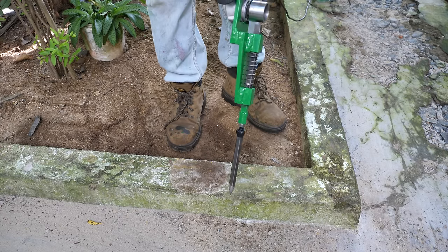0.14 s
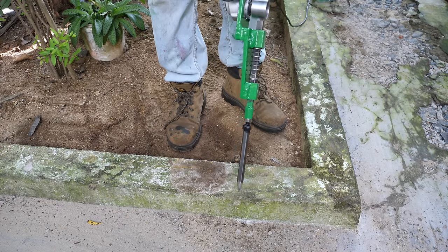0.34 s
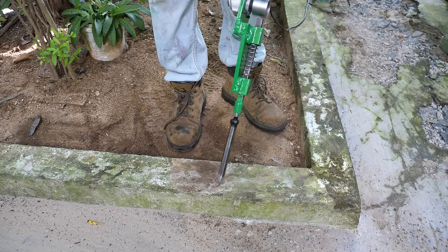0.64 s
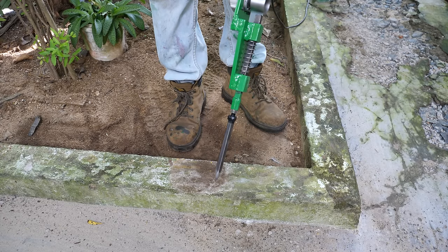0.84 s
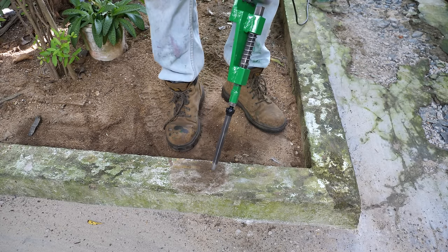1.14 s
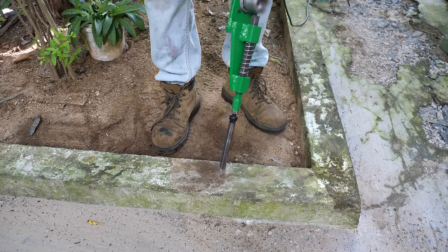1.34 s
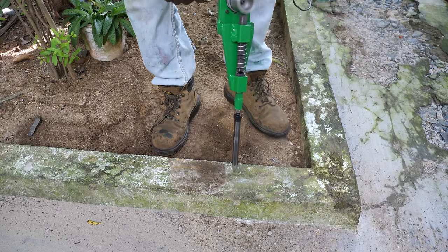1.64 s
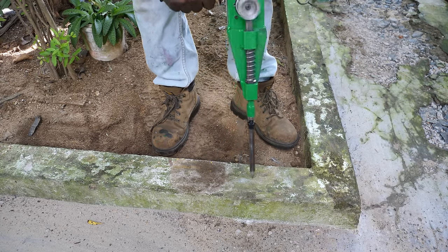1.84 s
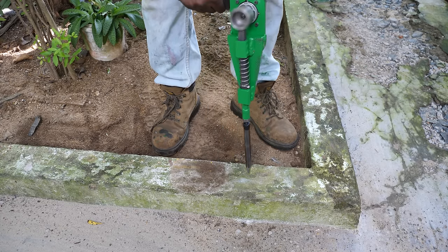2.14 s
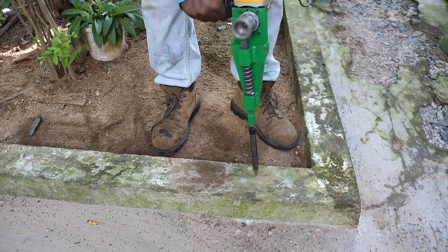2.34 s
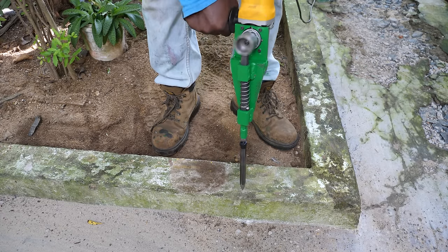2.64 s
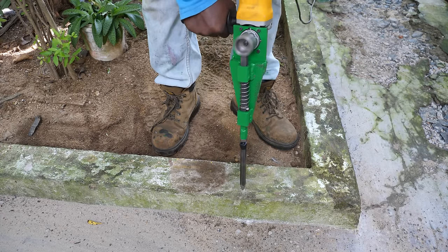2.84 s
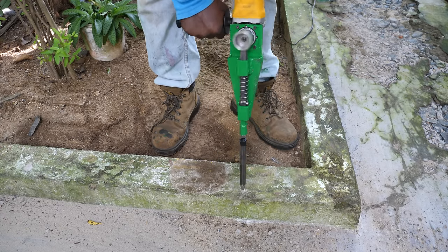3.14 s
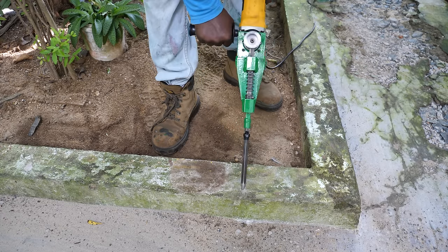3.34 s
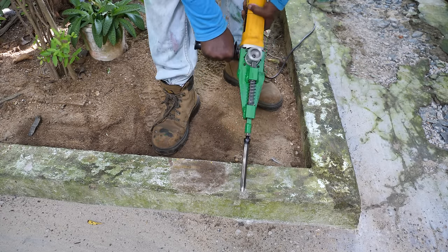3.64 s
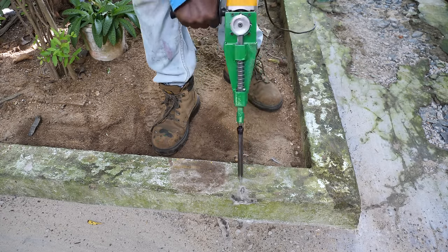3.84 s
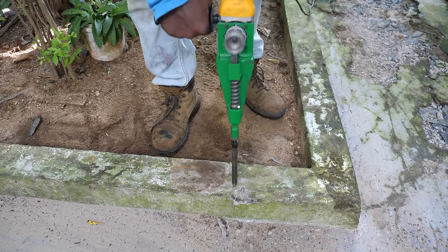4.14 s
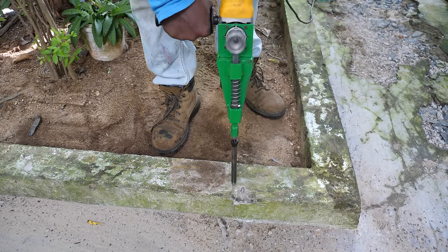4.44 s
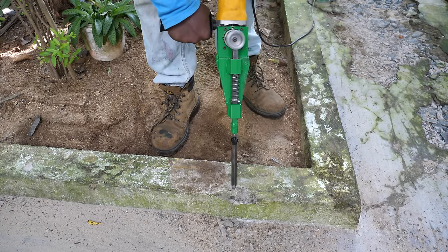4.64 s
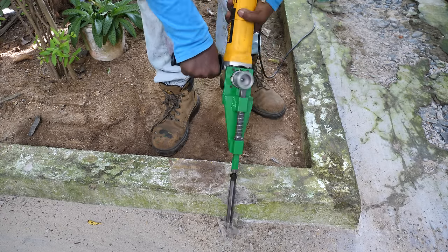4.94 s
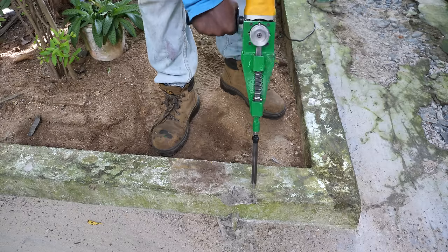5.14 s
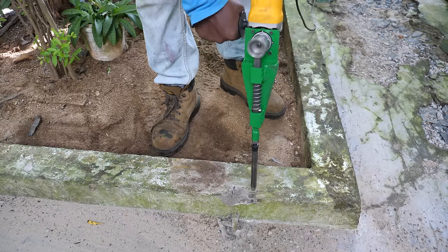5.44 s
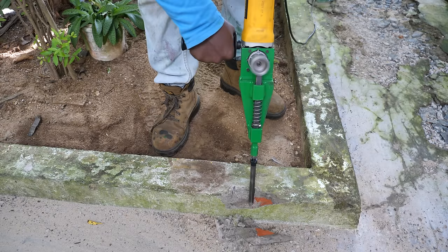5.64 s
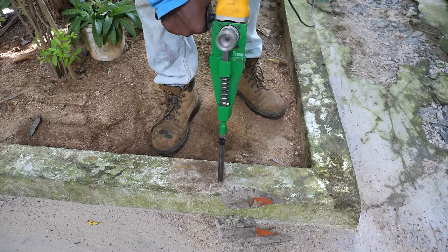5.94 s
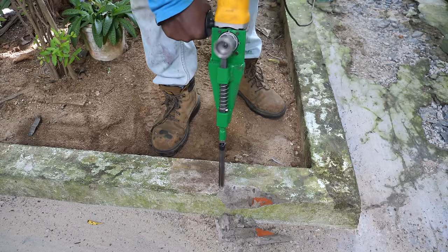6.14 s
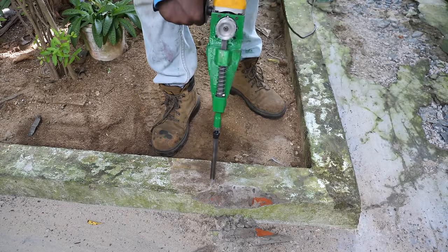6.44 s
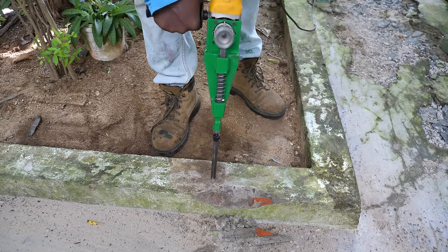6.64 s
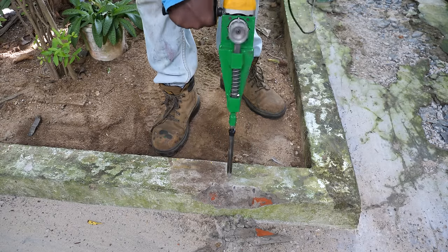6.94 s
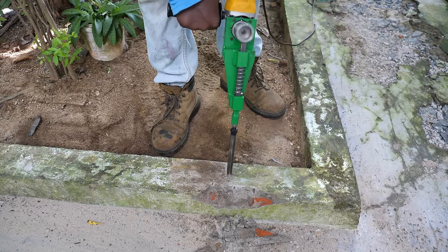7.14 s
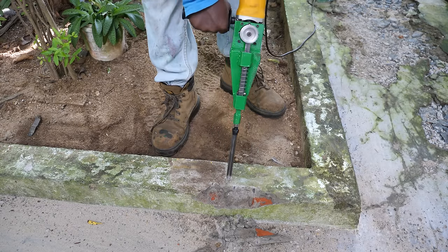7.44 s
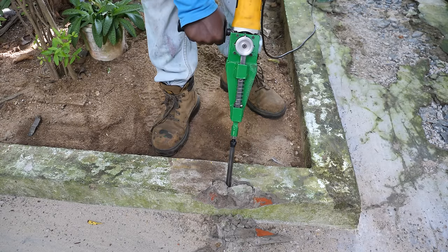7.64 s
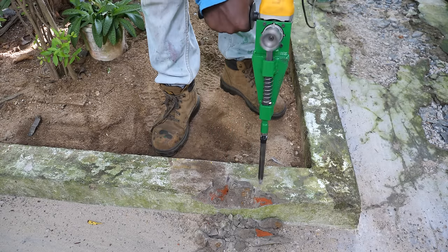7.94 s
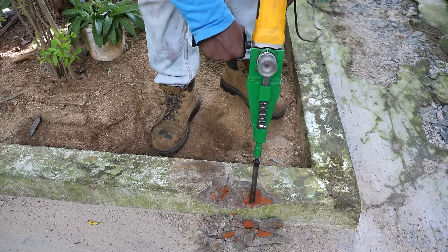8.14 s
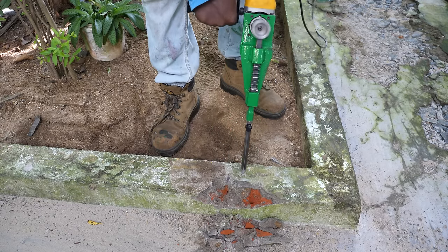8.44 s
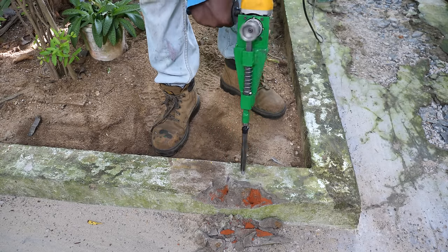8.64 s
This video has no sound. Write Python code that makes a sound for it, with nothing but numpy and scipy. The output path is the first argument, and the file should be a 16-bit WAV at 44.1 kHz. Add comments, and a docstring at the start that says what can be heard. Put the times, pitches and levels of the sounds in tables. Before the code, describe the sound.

Outdoors, a power chisel jolts on with metallic cracks, rattles loudly, then whines high and hammers concrete in gritty, motor-sagging bursts.

```python
"""Angle grinder chiselling a kerb

Outdoors, close to one microphone, a grinder with a chisel attachment starts with a jolt: struck-steel cracks.
Its loose parts rattle as noise-driven resonances over a crank's hum, then give way abruptly to a high whine.
Each time the chisel is pressed into the concrete the motor sags; the tip taps once a turn, and its bounce
makes a heavier blow every few turns. These impulses shape crushed grit, knocks, and singing overtones."""
import sys
import numpy as np
from scipy import signal
from scipy.fft import rfft, irfft
from scipy.io import wavfile
from scipy.ndimage import uniform_filter1d

SR = 44100
rng = np.random.default_rng(int(sys.argv[2]) if len(sys.argv) > 2 else 0)


def unload_audio(sound):
    """Save the sound as a 16-bit wav file, at the path given as the first command line argument."""
    columns = np.transpose(np.atleast_2d(sound))
    # keep every value between -1 and 1, then stretch to whole-number steps
    steps = np.round(np.clip(columns, -1, 1) * 32767)
    wavfile.write(sys.argv[1], SR, steps.astype(np.int16))


N = 388080
TIME = np.arange(N) / SR  # s

JOLT_S, CHANGE_S = 0.343, 2.456  # the rattle starts; the whine replaces it
FREE_HZ, LABOUR_HZ = 798.7, 595  # motor turns per second, running free and under full load

# spectrum of crushed concrete: (frequency [Hz], level [dB])
GRIT = [(30, -19), (300, -31), (450, -28), (650, -10), (1700, -14.5), (2800, -3), (4500, -4), (6300, 1.5),
        (7500, 7), (8700, -0.5), (10500, 0.5), (13200, 10), (14500, 8.5), (15800, 4)]
# chisel pressed into the concrete: (start [s], end [s], push eases before the end [s], speed it sags toward [Hz],
# sag time [s], dust [dB], dust change [dB/s], coarse grit relative to dust [dB], knock at full-load speed [dB])
BITES = [(2.647, 3.781, 0.062, 604.3, .239, -23.5, -3, -5.5, -38.5),
         (4.42, 4.992, .01, 615.4, .1, -24, -8.5, -4, -38.5),
         (5.202, 5.673, 0.00016, 558.2, 0.23, -25.5, 2.5, -4, -38),
         (5.705, 5.775, 0.00044, 780, .087, -26.5, 0, -7, -45),
         (5.971, 6.327, .025, 574, 0.12, -24, -12, -4.5, -37),
         (6.678, 6.824, 0.00073, 648.6, 0.082, -23.5, -9, -4, -35),
         (6.999, 7.685, .01, 603.4, .088, -25, -5.5, -4.5, -37),
         (7.7, 7.741, 0.00033, 781.5, 0.0867, -28, 0, -3.5, -52),
         (7.971, 8.21, 0.021, 706, 0.071, -23.5, -16, -3.5, -47),
         (8.388, 8.901, 0, 566.4, .28, -27, -4, -0.8, -37)]
# tip sits firmly and taps evenly: (start [s], end [s], share of the bounce lost [0-1],
# singing overtones [dB], third overtone [dB], change of the coarse grit [dB])
SEATED = [(3.154, 3.25, 0.12, -26, -55, -1.5), (3.276, 3.473, 0.56, -38.5, -47, -4),
          (3.473, 3.774, 0.25, -32.5, -40.5, 0), (4.762, 4.99, 0.65, -39.5, -45, -2.5),
          (5.52, 5.665, 0.6, -40.5, -55, -2), (5.677, 5.8, 0.62, -49, -62, 1),
          (6.185, 6.263, 0.36, -41.5, -54, 0.5), (7.298, 7.371, .8, -48, -56, -1),
          (7.502, 7.66, 0.73, -43, -56, 2), (7.697, 7.742, 0.83, -43, -58, -1.5)]


def undb(db):
    """Decibels to amplitude gain: 20 dB is a factor of ten."""
    return np.exp(np.asarray(db) * (np.log(10) / 20))


def curves(table):
    """The columns of a table, interpolated linearly in time."""
    s, *columns = np.transpose(table)
    return [np.interp(TIME, s, c) for c in columns]


def noise():
    """White noise: equal power at all frequencies."""
    return rng.standard_normal(N)


def unit(x):
    """Normalise to rms 1."""
    return x / np.sqrt(np.mean(x ** 2))


def even(x, size=1500):
    """Hold the short-term rms at 1, keeping the texture faster than the window of size samples."""
    power = np.abs(uniform_filter1d(x ** 2, size))
    return x / np.sqrt(power + 1e-9)


def walk(rate):
    """Smooth random wandering of rms 1: held random steps, rate per second, under a moving average."""
    k = max(int(SR / rate), 1)
    steps = rng.standard_normal(N // k + 1)
    return unit(uniform_filter1d(np.repeat(steps, k)[:N], k))


def colour(x, points, size=4096):
    """Minimum-phase filter with a (Hz, dB) response, found by folding the cepstrum."""
    hz, db = np.transpose(sorted(points))
    bins_hz = np.arange(size // 2 + 1) * SR / size
    gain = undb(np.interp(np.log(bins_hz + 1), np.log(hz), db))
    cepstrum = irfft(np.log(gain))
    cepstrum[1:size // 2] *= 2
    cepstrum[size // 2 + 1:] = 0
    response = irfft(np.exp(rfft(cepstrum)))
    return signal.oaconvolve(x, response)[:N]


def ring(x, hz, width):
    """One damped resonance; its Q is frequency over bandwidth."""
    return signal.lfilter(*signal.iirpeak(hz, hz / width, fs=SR), x)


def fade(x, seconds):
    """Exponential decay after each impulse, by a one-pole recursion."""
    return signal.lfilter([1], [1, -np.exp(-1 / (seconds * SR))], x)


def impulses(times, sizes):
    """Impulses at fractional sample times, each shared linearly between two neighbours."""
    at = np.clip(np.asarray(times) * SR, 0, N - 2)
    i = at.astype(int)
    early = np.bincount(i, sizes * (1 - at + i), N)
    late = np.bincount(i + 1, sizes * (at - i), N)
    return early + late


def gate(start, end, edge):
    """On (1) between two times, with linear ramps of edge seconds."""
    return np.clip(np.minimum(TIME - start, end - TIME) / edge + .5, 0, 1)


def yard():
    """Broadband ambience: filtered noise, much quieter once the tool starts, and one narrow-band chirp before."""
    # spectrum of the outdoor air: (frequency [Hz], level [dB])
    air_spectrum = [(35, -49), (60, -23.5), (355, -11.5), (780, -17), (895, -19), (1450, -22),
                    (6680, -35.5), (15000, -56)]
    chirp = unit(ring(ring(noise(), 6670, 220), 6600, 220)) * gate(0.13, 0.21, .03)
    level_db = -48.5 + walk(23.0) - 30.3 * gate(JOLT_S, np.inf, 0.011)
    return unit(colour(noise(), air_spectrum)) * undb(level_db) + undb(-59) * chirp


def chips():
    """Brittle fracture: decaying bright noise as the tip grazes the concrete or breaks a bit off."""
    # lone cracks and grazes: (time [s], level before the high-pass [dB], fade [s])
    cracks = [(3.99, -20, .009), (4.03, -22, .014), (4.09, -16, .022), (5.685, -15, .0015),
              (6.326, -14, .001), (6.832, -6, .0009), (6.84, -16, .002), (6.998, -11, .0006),
              (7.228, -15, .001), (8.192, -19, .002)]
    bursts = sum(fade(impulses([s], undb(db)), seconds) for s, db, seconds in cracks)
    crack = unit(colour(noise(), GRIT)) * bursts
    return signal.sosfilt(signal.butter(2, 2200, "high", fs=SR, output="sos"), crack)


def jolt():
    """Impact excitation: the hammer's first blows crack through the steel, and one clunks the housing."""
    # first blows: (time [s], strength before cushioning [dB])
    first_blows = [(0.342, -3), (0.347, 13), (0.362, 7), (.368, 1), (0.376, 2), (0.385, -3), (0.393, -2),
                   (0.403, 6), (0.42, 4)]
    s, db = np.transpose(first_blows)
    strikes = np.tanh(fade(impulses(s, undb(db)), 0.0053))  # the spring cushions the hardest blows
    cracks = even(ring(ring(noise(), 5140, 1900), 4800, 3200), size=40) * strikes
    housing = even(ring(ring(noise(), 1380, 790), 1300, 1200), size=150)
    clunk = housing * fade(impulses([JOLT_S], 0.86), 0.041)
    return undb(-12.0) * cracks + undb(-20.5) * clunk


def rattle():
    """Modal excitation: dense clatter rings the casing, spring and chisel over the crank's harmonic hum."""
    # loose parts: (time [s], level once built up [dB], ring of the spring before levelling [dB])
    loose_parts = [(.36, -21, -25.5), (.47, -17.5, -9.5), (.7, -17.5, -5.5), (1.0, -18.5, -3.5),
                   (1.42, -17.5, -0.5), (1.6, -18.5, -13.5), (1.75, -16, -11.5), (1.8, -19.5, -26),
                   (1.86, -16, -47), (2.44, -18, -34)]
    # crank: (time [s], turns per second [Hz], hum [dB], overtones relative to the hum [dB])
    crank = [(.34, 140, -70, 17), (.55, 205.2, -74, 20), (.75, 231, -65, 10), (1.0, 250.3, -58, 4),
             (1.5, 254, -56, -1), (1.65, 253.6, -49, -2), (1.85, 251.3, -45, -2.5), (2.46, 253.2, -52, 5)]
    # crank overtones: (multiple of the turning rate [1], mean level [dB])
    crank_orders = [(2, -5.5), (3, 0.5), (3.6, -2)]
    # steel modes: (frequency [Hz], width [Hz], mean level at first [dB], mean level once upright [dB])
    steel_modes = [(1122, 21, -23, -34), (3660, 70, -16, -22), (3850, 22, -58, -17), (5680, 490, -5.5, -7),
                   (7870, 910, -5.5, -19), (9180, 170, -10, -8), (10490, 77, -19, -11.5),
                   (11560, 160, -8.5, -10.5), (13000, 1000, -11.5, -13)]
    # spectrum of the casing: (frequency [Hz], level [dB])
    casing = [(30, -39), (150, -43), (300, -26), (500, -12), (800, -7.5), (1500, 0), (2200, -1),
              (3500, 2.5), (4200, 2.5), (5300, 5.5), (6300, 2.5), (7000, -0.5), (13200, -18), (15800, 2.5)]

    level_db, spring_db = curves(loose_parts)
    hz, hum_db, overtone_db = curves(crank)
    angle = 2 * np.pi * np.cumsum(hz * (1 + 0.0033 * walk(23.85))) / SR
    clatter = noise() * undb(1.44 * walk(700) + 1.0 * walk(70))
    body = unit(colour(clatter, casing))

    upright = gate(1.45, np.inf, 1.0)  # the tool comes to stand upright
    steel = 0
    for f, width, first_db, later_db in steel_modes:
        # the contact points shift, so each mode swells and sinks on its own
        mode_db = first_db + (later_db - first_db) * upright + 2.06 * walk(40.5)
        steel = steel + unit(ring(clatter, f, width)) * undb(mode_db)

    # the coil spring sings on one note, then rattles over a wider band
    note = unit(ring(noise(), 2862, 76))
    spread = unit(ring(ring(noise(), 2930, 670), 3110, 750))
    loose = gate(0.93, np.inf, 0.2)
    spring = unit(np.sqrt(1 - loose) * note + np.sqrt(loose) * spread)
    spring = spring * undb(spring_db + 2 * walk(61.3))

    build_up = np.clip((TIME - JOLT_S) / 0.096, 0, 1)
    tool = even(undb(-0.5) * body + build_up * steel + spring, size=4000)
    tool = tool * undb(level_db - 6.9 * (1 - build_up))
    overtones = sum(undb(db + 2 * walk(15)) * np.sin(k * angle) for k, db in crank_orders)
    hum = np.sqrt(2) * undb(hum_db) * (np.sin(angle) + undb(overtone_db) * overtones)
    return (tool + hum) * gate(JOLT_S, CHANGE_S, 0.0028)


def motor_speed():
    """First-order lag: the speed sags exponentially in each bite and climbs back as the push eases."""
    # the hand briefly eases (+) or leans harder (-): (time [s], peak change before smoothing [Hz])
    nudges = [(2.75, -16), (3.2, -9), (3.418, 26), (3.562, -20), (4.13, -16), (4.729, 9), (4.85, -24),
              (4.93, 20), (5.75, -36), (6.641, 12), (7.23, -11), (7.45, 19.5)]
    spin_up_s, sag_delay_s, nudge_s = .087, .033, .05
    hz = np.full(N, float(FREE_HZ))
    for start, end, ease_s, loaded_hz, sag_s, *_ in BITES:
        sag = (start + sag_delay_s, loaded_hz, sag_s)
        recovery = (end - ease_s, FREE_HZ, spin_up_s)
        for since, goal_hz, lag_s in (sag, recovery):
            gap_hz = np.interp(since, TIME, hz) - goal_hz
            glide = goal_hz + gap_hz * np.exp(-np.maximum(TIME - since, 0) / lag_s)
            hz = np.where(TIME > since, glide, hz)
    hz = hz + sum(change_hz * np.exp(-((TIME - s) / nudge_s) ** 2) for s, change_hz in nudges)
    # the rotor's inertia rounds each change
    return uniform_filter1d(hz, size=1500) * (1 + .0012 * walk(50))


def contact(hz):
    """Contact mechanics: pressed, first dig, bounce depth (0-1); gains of dust, coarse grit and knock."""
    # tip skims without loading the motor: (start [s], end [s], dust [dB],
    # coarse grit relative to dust [dB], knock [dB])
    skims = [(2.4, 2.643, -24, -12.5, -49), (3.85, 3.94, -27.5, -12, -50), (4.181, 4.295, -26, -4, -52),
             (4.317, 4.423, -28, -3.5, -49)]
    # chisel kicks back in a short fit of hard blows: (centre [s], length [s], knock gain [dB])
    kicks = [(3.05, .06, 2), (3.155, .04, 2), (3.265, 0.09, 2.5), (3.67, 0.037, 5.5), (4.485, 0.059, 6),
             (4.58, 0.11, 6.5), (4.68, 0.031, 3), (4.75, 0.025, 4.5), (4.828, 0.027, 4), (6.066, .04, 6),
             (6.29, 0.044, -1.5), (7.215, 0.075, 2), (7.437, 0.063, 3)]
    bounce_depth, bounce_build_s, skim_depth = 0.91, 0.031, .1
    first_crush_db, first_crush_s = 4, 0.027  # extra dust as the tip first digs in
    knock_db_per_hz = -0.0494  # slower blows knock harder

    pressed, dig, depth, dust, coarse, knock = np.zeros((6, N))
    for start, end, _, _, _, dust_db, db_per_s, coarse_db, knock_db in BITES:
        on = gate(start, end, 0.027)
        age = np.clip(TIME - start, 0, end - start)
        fresh = np.exp(-age / first_crush_s)
        crushed = on * undb(dust_db + db_per_s * age + first_crush_db * fresh)
        pressed = pressed + on
        dig = dig + on * fresh
        depth = depth + on * bounce_depth * (1 - np.exp(-age / bounce_build_s))
        dust = dust + crushed
        coarse = coarse + crushed * undb(coarse_db)
        knock = knock + on * undb(knock_db + knock_db_per_hz * (hz - LABOUR_HZ))
    for start, end, dust_db, coarse_db, knock_db in skims:
        on = gate(start, end, 0.034)
        dust = dust + on * undb(dust_db)
        coarse = coarse + on * undb(dust_db + coarse_db)
        depth = depth + on * skim_depth
        knock = knock + on * undb(knock_db)
    for start, end, share, _, _, coarse_db in SEATED:
        on = gate(start, end, .03)
        depth = depth * (1 - share * on)
        coarse = coarse * undb(on * coarse_db)
    for s, length, db in kicks:
        on = gate(s - length / 2, s + length / 2, 0.02)
        depth = np.maximum(depth, on)
        knock = knock * undb(on * db)
    return np.clip(pressed, 0, 1), dig, np.clip(depth, 0, 1), dust, coarse, knock


def taps(hz, depth, slip=.15, scatter_db=1.3):
    """Subharmonic impact: one tap a turn; a bouncing chisel lands a heavy blow every few turns, then weaker taps."""
    # a faster motor throws the chisel further: (motor speed [Hz], mean turns per heavy blow [1])
    bounce_turns = [(600, 2.1), (650, 3.8), (700, 4.9), (795, 5.7)]
    turns = np.cumsum(hz) / SR
    times = np.interp(np.arange(1, int(turns[-1])), turns, TIME)
    # the bounce catches and lets go in short fits, holding one rhythm for a moment
    depth = np.clip(np.interp(times, TIME, depth * (1 + .22 * walk(24))), 0, 1)
    period = np.interp(hz, *np.transpose(bounce_turns)) + 0.3 * walk(18)
    period = np.interp(times, TIME, period)
    period_chance, size_chance, time_chance = rng.standard_normal((3, len(times)))
    since = np.zeros(len(times))  # turns since the last heavy blow
    for i in range(1, len(times)):
        landed = since[i - 1] + 1.5 > period[i] + slip * period_chance[i]
        since[i] = 0 if landed else since[i - 1] + 1
    sizes = 1 - depth + depth * np.exp(-since / 0.6)
    sizes = sizes * undb(scatter_db * depth * np.tanh(size_chance))
    return impulses(times + 4e-5 * depth * time_chance, sizes)


def singing(angle):
    """Harmonic series: where the tip is seated, the overtones of the motor sing out clearly."""
    # overtones under even tapping: (multiple of the motor speed [1], mean relative level [dB])
    load_orders = [(2, -6.5), (4, -2.5), (5, 1), (6, -0.5), (7, -1), (8, -15), (9, -8), (10, -5), (11, -13),
                   (12, -13)]
    swayed = angle + 0.24 * walk(25)
    clear = sum(undb(db + 3.0 * walk(16)) * np.sin(k * swayed) for k, db in load_orders)
    third = np.sin(3 * angle) * undb(1.4 * walk(30))
    song = 0
    for start, end, share, db, third_db, _ in SEATED:
        tones = share * undb(db) * clear + undb(third_db) * third
        song = song + gate(start, end, 0.034) * tones
    return song


def chiselling():
    """Impulsive and tonal excitation: the motor whines and hisses; in bites its taps knock and crush grit."""
    # spectrum of the free motor's rush, upper and lower part: (frequency [Hz], level [dB])
    rush_high = [(1530, -10.5), (2600, -6.5), (2890, -2), (3620, 0), (3960, -1.5), (5430, 2.5), (9130, 2),
                 (11800, 9), (15700, 10)]
    rush_low = [(30, -44), (300, -60), (600, -24.5), (1000, -18.5), (1800, -11.5)]
    # spectrum of the knocks: (frequency [Hz], level [dB])
    knock_spectrum = [(30, -36), (120, -26.5), (300, -21), (450, -13.5), (600, 1), (900, 6), (1200, 5),
                      (1850, -1.5), (2400, 4.5), (3600, -2.5), (5000, -25), (8000, -15), (15000, -6)]
    # whine of the free motor: (multiple of the motor speed [1], mean level relative to the fundamental [dB])
    whine_orders = [(1.6, -12), (2.001, -1.5), (3, -2.5), (3.06, -6), (4.001, -6), (7.001, 1)]
    rush = rush_low + rush_high

    hz = motor_speed()
    angle = 2 * np.pi * np.cumsum(hz) / SR
    pressed, dig, depth, dust_gain, coarse_gain, knock_gain = contact(hz)
    over_free_hz, over_labour_hz = hz - FREE_HZ, hz - LABOUR_HZ
    fan_gain = (1 - pressed) * undb(-28 + 0.0663 * over_free_hz)
    blows = taps(hz, depth)

    # each tap crushes a short burst of grains, and the dust hisses on a little longer
    crush = unit(fade(blows, 0.0017)) + 0.76 * unit(fade(blows, 0.0021))
    grains = noise() * crush * undb(1.0 * walk(3000))
    # heavy bounces ring the chisel, more so at higher speed; even tapping sounds flatter
    ringing = depth * np.clip(0.7 + 0.0073 * over_labour_hz, 0, 1)
    flat = unit(colour(grains, rush))
    grit = even(ringing * unit(colour(grains, GRIT)) + (1 - ringing) * flat)
    air = even(colour(noise() * undb(1.3 * np.sin(angle) + 1.37 * walk(300)), rush))
    scrape = even(pressed * grit + (1 - pressed) * air) * undb(0.37 * walk(35))

    # coarse grit sounds lower than fine dust
    coarse = signal.sosfiltfilt(signal.butter(3, 9800, fs=SR, output="sos"), scrape)
    low_part = even(coarse, size=4000) * np.hypot(coarse_gain, fan_gain * undb(-3.5))
    high_part = even(scrape - coarse, size=4000) * np.hypot(dust_gain, fan_gain)

    # the heavy blows shake the tool far more than the light taps
    weighted = blows * np.abs(uniform_filter1d(blows, size=5)) ** .5
    knock = even(colour(weighted, knock_spectrum)) * knock_gain

    free = np.cos(angle) + sum(undb(db + 2 * walk(20)) * np.sin(k * angle) for k, db in whine_orders)
    free_whine = (1 - pressed) * free * undb(-49 + 0.15 * over_free_hz)
    load_whine = pressed * np.cos(angle) * undb(-43.5 - 0.0617 * over_labour_hz)
    whine = np.sqrt(2) * (free_whine + load_whine)
    whine = whine * (1 - .5 * dig)  # the first dig damps it

    # while the chisel bounces the overtones turn into a rough squeal
    squeal = np.sin(4 * angle + 0.54 * walk(150)) + 0.86 * np.sin(6 * angle + 1.3 * walk(200))
    rough = pressed * depth * squeal * dust_gain * undb(-19)
    gears = np.sqrt(dig) * squeal * undb(-39)  # the gears cry out as they take up the load
    mix = low_part + high_part + knock + whine + singing(angle) + rough + gears
    return mix * gate(CHANGE_S, np.inf, 0.0028)


def scene():
    """Superposition: all sources add at one microphone, the same in both channels."""
    mono = yard() + chips() + jolt() + rattle() + chiselling()
    return np.tile(mono, (2, 1))


def record(dry):
    """Band limiting: the recorder cuts the top with a steep elliptic low-pass at 15.8 kHz."""
    return signal.sosfilt(signal.ellip(12, .1, 80, 15800, fs=SR, output="sos"), dry)


dry = scene()
out = record(dry)
unload_audio(out)
```